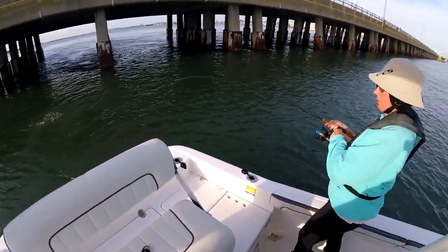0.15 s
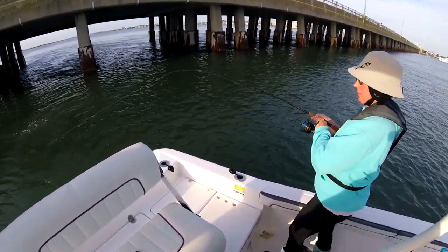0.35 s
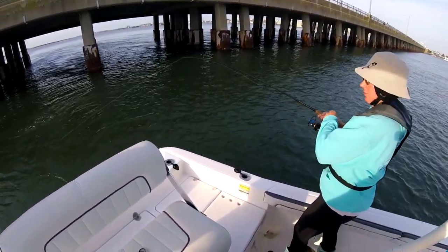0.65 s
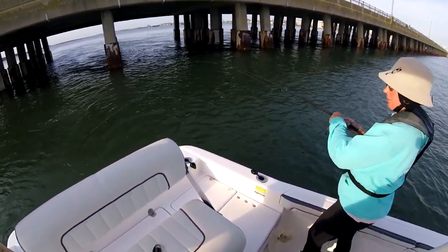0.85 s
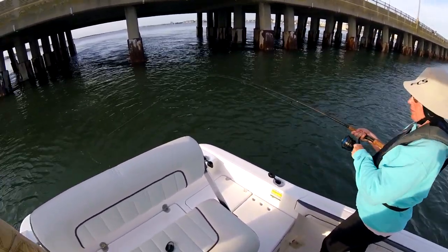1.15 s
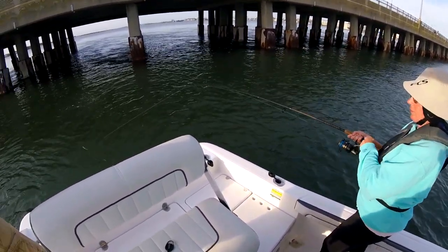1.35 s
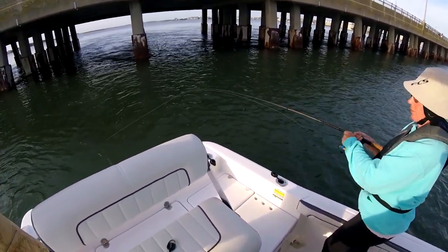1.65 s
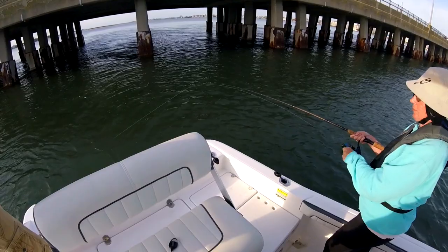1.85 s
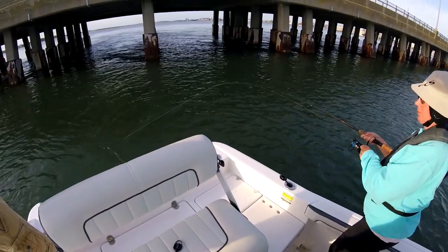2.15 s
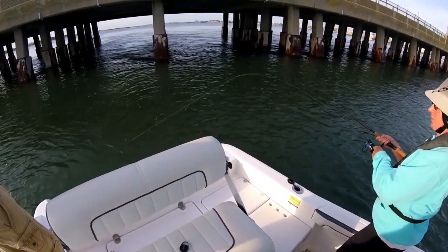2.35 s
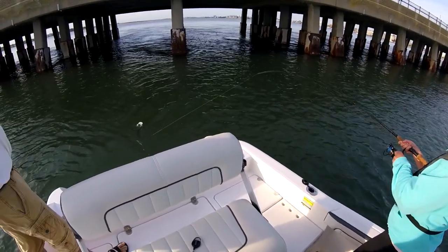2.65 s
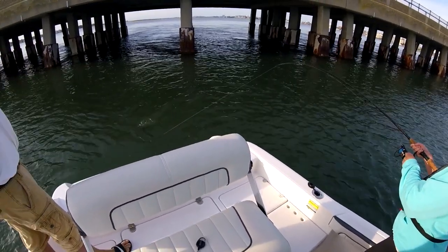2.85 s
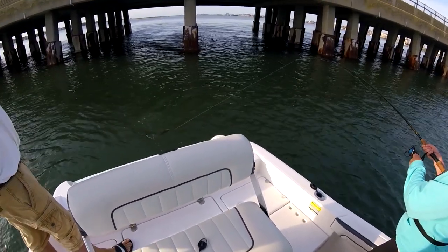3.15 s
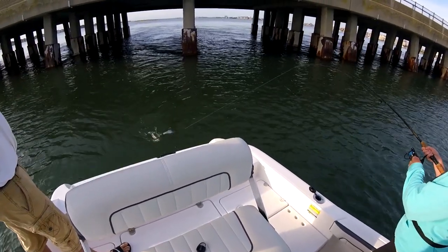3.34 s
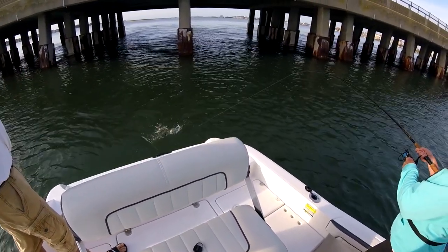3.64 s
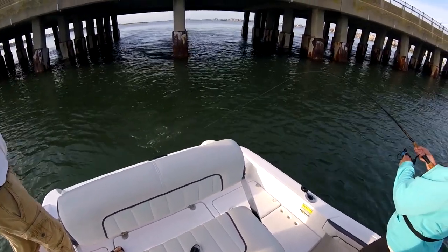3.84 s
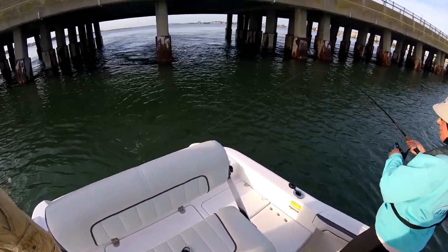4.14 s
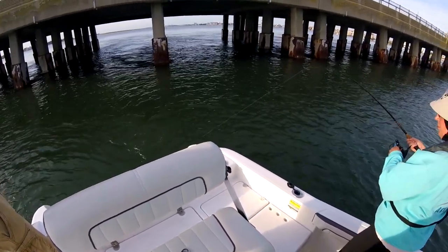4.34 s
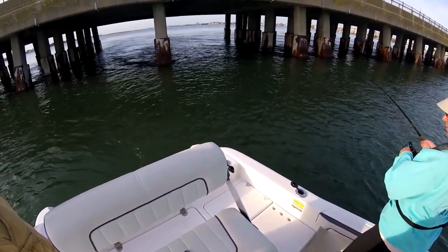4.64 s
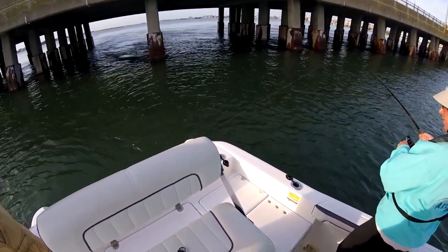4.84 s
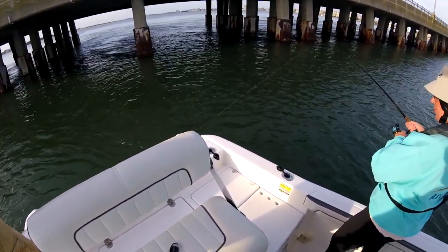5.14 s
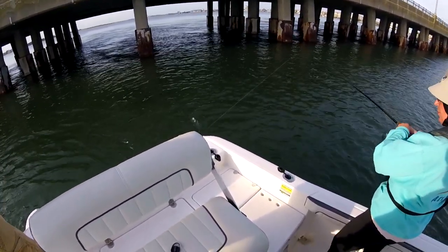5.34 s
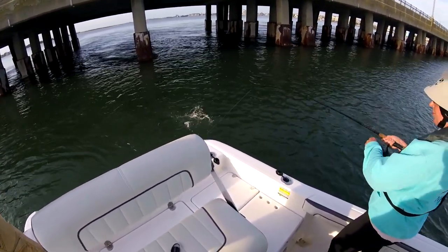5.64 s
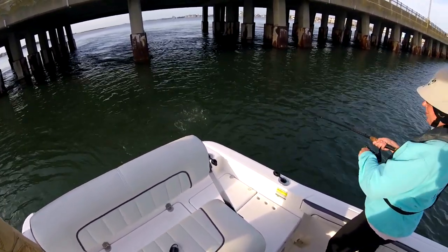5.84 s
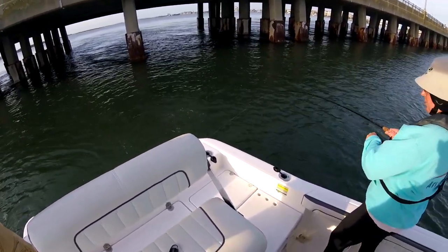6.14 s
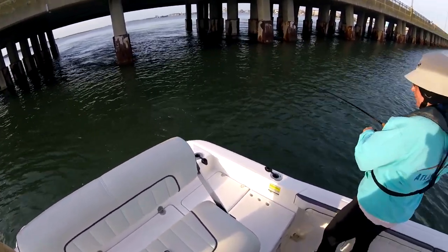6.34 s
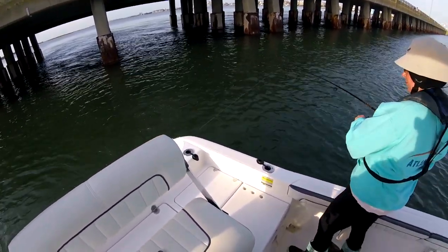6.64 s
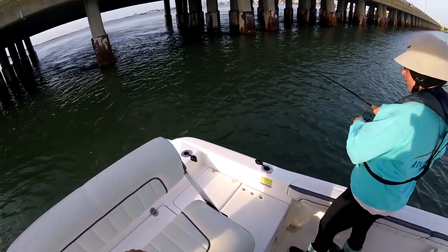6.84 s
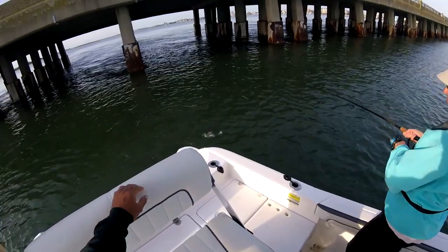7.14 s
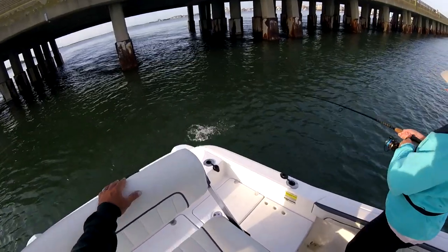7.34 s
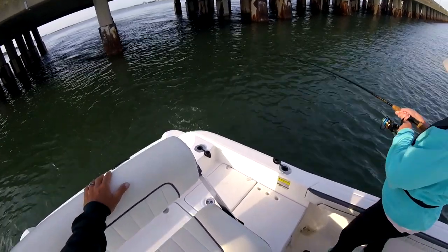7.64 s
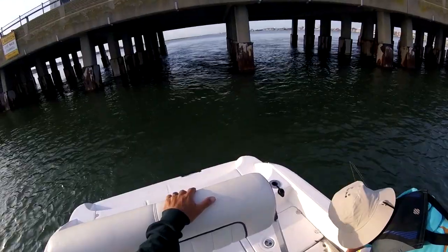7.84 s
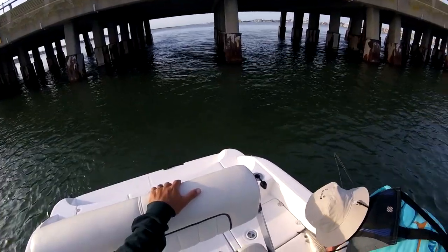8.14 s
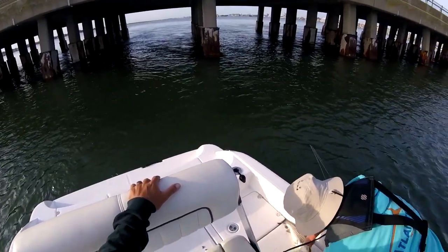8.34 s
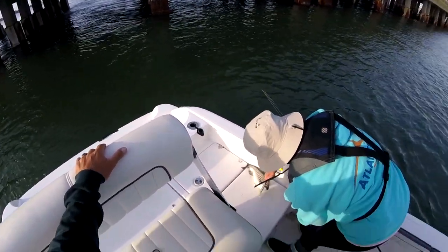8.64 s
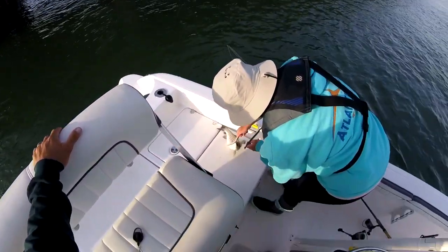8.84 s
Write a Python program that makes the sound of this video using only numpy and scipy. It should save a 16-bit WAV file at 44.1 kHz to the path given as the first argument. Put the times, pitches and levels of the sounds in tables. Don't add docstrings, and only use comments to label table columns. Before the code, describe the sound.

A small boat's engine idles with a low hum while wind buffets the microphone, a fish splashes nearby, and a hand thumps a cushion.

```python
import sys
import numpy as np
from scipy import signal
from scipy.fft import rfft, irfft, next_fast_len
from scipy.io import wavfile
from scipy.ndimage import uniform_filter1d, map_coordinates

SR = 44100
rng = np.random.default_rng(int(sys.argv[2]) if len(sys.argv) > 2 else 0)


def log_audio(samples):
    frames = np.atleast_2d(samples).T
    limited = np.clip(frames, -1, 1)
    pcm = np.round(limited * 32767).astype(np.int16)
    wavfile.write(sys.argv[1], SR, pcm)


def nominal_scale(level):
    x = np.asarray(level, float) / 20
    return 10 ** x


N = 396459

# (time [s], firing rate [Hz], third order level [dB])
IDLE = [(0.0, 42.6, -38), (0.32, 44.32, -32), (1.2, 43.87, -33), (1.4, 42.2, -36), (1.65, 43.37, -33.5),
        (2.53, 43.1, -34.5), (2.63, 43.81, -33), (3.98, 43.07, -33.5), (4.06, 41.84, -39.5),
        (4.46, 42.02, -32.5), (4.56, 43.54, -34), (7.24, 43.76, -33), (7.59, 42.4, -35),
        (7.76, 45.3, -29.5), (8.01, 42.8, -36), (8.49, 42.7, -34), (8.66, 44.25, -33.5), (8.99, 43.95, -31)]
# (frequency [Hz], gain [dB])
SOFT_HISS = [(2000, -30), (2900, 3), (3500, -12), (4200, -8), (5200, 1), (6200, -3.5), (7600, -7),
             (9000, -18), (11000, -12.5), (13000, -40)]


def unit(x):
    return x / np.sqrt(np.mean(x ** 2) + 1e-20)


def curves(rows):
    s, *cols = np.transpose(rows)
    return [np.interp(np.arange(N) / SR, s, c) for c in cols]


def wobble(rate_hz):
    return map_coordinates(rng.standard_normal(int(N * rate_hz / SR) + 4), [np.arange(N) * rate_hz / SR])


def bells(rows):
    t = np.arange(N) / SR
    return sum(height * np.exp(-((t - s) / length_s) ** 2) for s, height, length_s in rows)


def filtered(x, response):
    m = next_fast_len(N + SR // 2)
    return irfft(rfft(x, m) * response(np.fft.rfftfreq(m, 1 / SR)), m)[:N]


def above(x, hz):
    return filtered(x, lambda f: 1 / (1 + (hz / (f + 1)) ** 6))


def colour(points):
    hz, db = np.transpose(points)
    return lambda f: nominal_scale(np.interp(np.log(f + 1), np.log(hz), db))


def modes(rows):
    def response(f):
        total = 0
        for k, (hz, width_hz, db) in enumerate(rows):
            damping = 1j * f * width_hz
            total = total + (-1) ** k * nominal_scale(db) * damping / (hz * hz - f * f + damping)
        return total
    return response


def rush(response, patchy_db):
    z = signal.stft(rng.standard_normal(N), nperseg=512)[2]
    field = uniform_filter1d(rng.standard_normal(z.shape), size=6, axis=0)
    field = uniform_filter1d(field, size=14, axis=1)
    noise = signal.istft(z * nominal_scale(patchy_db * unit(field)), nperseg=512)[1][:N]
    return unit(filtered(noise, response))


def turned():
    return np.interp(np.arange(N) / SR, [7.68, 8.06], [0, 1])


def road():
    # (frequency [Hz], density [dB per Hz])
    tyres = [(210, -37), (350, -3), (389, -9), (436, -4.5), (480, -12), (617, -11.5), (872, -6.5),
             (1180, -10), (2520, -19), (4300, -39), (5590, -58), (9460, -120)]
    # (time [s], lift [dB], half length [s])
    cars = [
        (0.1, 3, 0.77),
        (2.65, 5, 0.28),
        (3.5, 0, 0.16),
        (5.45, 3.5, .2),
        (7.2, 0.5, 0.31),
    ]
    part_db = [-43, -44, -49]
    part_away_db = [3.5, -8.5, -10]
    part_lift = [0.29, 0.55, 1.05]
    roar = rush(colour(tyres), patchy_db=1.33)
    upper, top = above(roar, hz=990), above(roar, hz=1380)
    cars_db, away = bells(cars), turned()
    parts = zip([roar - upper, upper - top, top], part_db, part_away_db, part_lift)
    return sum(nominal_scale(db + away_db * away + lift * cars_db) * part for part, db, away_db, lift in parts)


def wind():
    # (time [s], level [dB])
    steady_rows = [(0.0, -41), (0.7, -39), (1.1, -39), (1.5, -37.5), (2.2, -42), (3.1, -41), (3.4, -40.5),
                   (4.2, -41.5), (5.2, -40), (5.7, -40.5), (8.2, -42), (8.46, -36.5), (8.99, -44.5)]
    # (frequency [Hz], gain [dB])
    buffet = [(18, -69), (28, -11), (42, -4), (60, -4), (110, 0.5), (150, -1), (200, -3.5), (330, -16),
              (600, -26), (1200, -63)]
    # (time [s], level [dB], half length [s])
    gust_rows = [(0.013, -32, 0.036), (0.262, -31.5, 0.031), (0.502, -46, 0.12), (0.688, -34.5, 0.027),
                 (0.785, -36, 0.046), (0.903, -39, 0.033), (0.994, -31, 0.027), (1.67, -33, 0.033),
                 (2.192, -35.5, .06), (2.28, -34, 0.03), (2.946, -36, 0.022), (3.148, -34.5, 0.046),
                 (4.197, -45, 0.058), (4.498, -42, 0.056), (5.998, -42, 0.043), (7.79, -50, 0.044)]
    lumps = nominal_scale(0.8 * wobble(11) + 0.8 * wobble(25))
    steady = nominal_scale(curves(steady_rows)[0] + 3.5)
    gusts = bells((s, nominal_scale(db), length_s) for s, db, length_s in gust_rows)
    return (steady + gusts) * unit(lumps * rush(colour(buffet), patchy_db=0.94))


def jacket():
    start_s, attack_s, level_db = 7.78, 0.12, -58.5
    start = np.clip((np.arange(N) / SR - start_s) / attack_s, 0, 1)
    return start * nominal_scale(level_db + 1.28 * wobble(14)) * rush(colour(SOFT_HISS), patchy_db=2.5)


def stream():
    # (frequency [Hz], density [dB per Hz])
    case = [(1940, 4.5), (3300, -3), (4380, -9.5), (5330, -0.5), (5930, -4), (6540, -1.5), (7130, -6),
            (8020, -9), (9580, -12.5), (10100, -15.5), (12700, -20.5), (15200, -12), (15900, -25)]
    # (frequency [Hz], width [Hz], level [dB])
    whistle = [(899, 20, -62), (6440, 200, -67), (9600, 250, -82), (15100, 150, -84), (15580, 140, -79)]
    beat = 1 + 0.04 * np.cos(2 * np.pi * np.cumsum(curves(IDLE)[0]) / SR)
    shake = nominal_scale(0.3 * wobble(9) + 0.5 * wobble(30)) * beat
    hiss = rush(colour(case), patchy_db=1.0)
    top = above(hiss, hz=12400)
    body_db = -51.5 + 0.14 * wobble(1.81)
    top_db = -48.5 - 1 * turned()
    patter = nominal_scale(body_db) * (hiss - top) + nominal_scale(top_db) * top
    ring = 0
    for hz, width_hz, db in whistle:
        cavity = modes([(hz, width_hz, 0)])
        ring = ring + nominal_scale(db) * unit(filtered(rng.standard_normal(N), lambda f: cavity(f) ** 2))
    return shake * patter + ring


def spray():
    # (frequency [Hz], width [Hz], level [dB])
    droplets = [(4850, 290, 0), (5360, 400, -0.5), (5850, 390, 3.5), (6500, 400, -6), (8000, 1200, -21),
                (10500, 1100, -9), (2980, 600, 0.5)]
    # (start [s], hold [s], level [dB])
    bursts = [
        (1.501, 0.37, -61),
        (3.4, 0.15, -58),
        (3.622, .22, -58),
        (5.45, 0.37, -55.5),
        (7.14, .17, -56.5),
        (7.46, 0.21, -56),
    ]
    attack_s, t60_s = 0.04, 0.8
    hits_per_s = 650 * nominal_scale(2.5 * wobble(70))
    fizz = 0
    for hz, width_hz, db in droplets:
        hits = (rng.random(N) < hits_per_s / SR) * rng.standard_normal(N)
        fizz = fizz + nominal_scale(db) * unit(filtered(hits, modes([(hz, width_hz, 0)])))
    t, swell = np.arange(N) / SR, 0
    for s, hold_s, db in bursts:
        rise = np.clip((t - s) / attack_s, 0, 1)
        swell = swell + rise * nominal_scale(db - 60 * np.maximum(t - s - hold_s, 0) / t60_s)
    return unit(fizz) * swell


def splashes():
    # (time [s], level [dB], t60 [s], low part [dB])
    rows = [
        (5.24, -46, .09, -4),
        (5.448, -46.5, .14, 4),
        (5.505, -47.5, 0.098, 1),
        (7.183, -48, 0.095, 4),
        (7.55, -52, .1, 1),
        (2.93, -53, .08, -1.5),
        (4.9, -59, 0.095, 11),
    ]
    # (frequency [Hz], gain [dB])
    wash = [(500, -30), (900, -3), (2500, 3.5), (4500, -6.5), (7000, -31)]
    t, high, low = np.arange(N) / SR, 0, 0
    for s, db, t60_s, low_db in rows:
        age = np.maximum(t - s, 0)
        swell = nominal_scale(db - 60 * age / t60_s) * (1 - np.exp(-age / 0.0036))
        high = high + swell
        low = low + nominal_scale(low_db) * swell
    grain = nominal_scale(3.9 * wobble(250))
    return grain * (high * rush(colour(SOFT_HISS), patchy_db=-0.5) + low * rush(colour(wash), patchy_db=-6.0))


def drops():
    # (time [s], peak [dB], pitch [Hz], plop [dB])
    rows = [(1.6811, -44, 6500, -10), (2.8455, -38, 5820, -6), (2.9612, -45, 5690, -3),
            (3.4057, -38.5, 5460, -15), (3.4361, -39, 5840, -13), (3.454, -30.5, 6440, -5),
            (3.5271, -35, 4690, 0), (3.71, -42.5, 5750, 8.5), (3.797, -34, 5800, -14),
            (4.0107, -43.5, 6440, 5), (5.239, -40, 6560, -2), (5.3332, -43, 5660, -6),
            (5.4415, -38, 4204, -8), (5.457, -39, 5600, -6), (5.6271, -41, 5555, -12),
            (5.6635, -42, 5050, -12), (5.7623, -41, 5540, -15), (7.055, -40, 6420, -18),
            (7.1231, -40, 6120, -3), (7.1851, -43, 5770, -3), (7.1921, -36, 5820, -5),
            (7.2713, -40, 4800, -12), (7.3244, -40, 3800, -8), (7.4861, -36, 5060, -14),
            (7.5065, -40, 3500, 0), (7.5641, -41, 5726, -5), (7.665, -45, 5670, -16),
            (7.6759, -42, 6140, -13), (7.7343, -45, 6360, -3), (7.7494, -44, 5300, -12)]
    t60_s, attack_s = 0.031, 0.00058
    ring, crack, t = np.zeros(N + SR), np.zeros(N + SR), np.arange(SR // 10) / SR
    for s, db, hz, plop_db in rows:
        plop_hz = 2480 * (1 + 0.07 * rng.standard_normal())
        fade = nominal_scale(db - 60 * t / t60_s) * (1 - np.exp(-t / attack_s))
        tick_drift, noise, plop_drift = rng.standard_normal((3, len(t)))
        tick = nominal_scale(-4.0) * np.sin(2 * np.pi * hz * t + 0.13 * np.cumsum(tick_drift))
        plop = nominal_scale(min(plop_db, 8) - 1.5) * np.sin(2 * np.pi * plop_hz * t + 0.16 * np.cumsum(plop_drift))
        ring[round(s * SR):][:len(t)] += fade * (tick + plop)
        crack[round(s * SR):][:len(t)] += fade * noise
    case = modes([(3300, 2000, -3), (5700, 2000, 0), (10200, 1500, -9), (13800, 1200, -16)])
    return ring[:N] + filtered(crack[:N], case)


def thumps():
    # (time [s], peak [dB], pitch [Hz], half length [s])
    rows = [
        (7.686, -21, 82, 0.0082),
        (7.7014, -14.5, 196, 0.0022),
        (7.79, -32, 237, 0.014),
        (8.405, -26, 94, .015),
        (8.421, -23.5, 220, 0.011),
        (8.43, -29, 420, 0.0035),
        (7.7, -31, 600, 0.0027),
        (7.712, -32.5, 514, 0.0045),
        (5.591, -35.5, 838, 0.0056),
    ]
    t, total = np.arange(N) / SR, 0
    for s, db, hz, length_s in rows:
        swell = nominal_scale(db) * np.exp(-((t - s) / length_s) ** 2)
        total = total - swell * np.cos(2 * np.pi * hz * (t - s))
    return total


def engine():
    # (multiple, level [dB])
    weak_orders = [(1, -54), (4, -66), (5, -51), (6, -49), (7, -55.5)]
    # (frequency [Hz], width [Hz], level [dB])
    hull = [(223, 85, -2.5), (313, 66, -2.5), (519, 69, -7.5)]
    # (frequency [Hz], width [Hz], level [dB])
    cavity = [(420.6, 21.6, -1.5), (444.5, 19, 0)]
    # (time [s], change [dB], half length [s])
    chokes = [(0.1, -4.5, 0.99), (1.95, -18, 0.079), (2.45, -7, 0.056), (3.2, -10, 0.077), (3.43, -8, .05),
              (4.2, -12, 0.26), (4.73, -6, .1), (6.0, -3.5, .2), (6.28, -13, 0.072), (6.8, 2.5, 0.4),
              (7.36, -1, .1), (8.08, -10, .12), (8.95, -8, .15)]
    hz, third_db = curves(IDLE)
    second_db = -37 + 0.88 * (third_db - third_db.mean())
    turn = 2 * np.pi * np.cumsum(hz * (1 + 0.002 * wobble(9))) / SR
    hum = nominal_scale(second_db + 3.5 + 0.47 * wobble(7.7)) * np.sin(2 * turn + 0.096 * wobble(8))
    hum += nominal_scale(third_db + 3.0 + 0.37 * wobble(7)) * np.sin(3 * turn + 0.52 * wobble(8))
    for k, db in weak_orders:
        hum += nominal_scale(db + 2.0 * wobble(4)) * np.sin(k * turn + 0.49 * wobble(6))
    puffs = (1 + 0.48 * np.cos(turn)) * rng.standard_normal(N)
    chug = unit(filtered(puffs, lambda f: modes(hull)(f) / (1 + (f / 700) ** 4)))
    boom = unit(filtered(puffs, lambda f: modes(cavity)(f) / (1 + ((f - 430) / 60) ** 2)))
    tenth = nominal_scale(-3 + 1.3 * wobble(5.2)) * np.sin(10 * turn + 0.81 * wobble(9))
    boom_db = -46 - 6.5 * turned() + bells(chokes)
    return hum + nominal_scale(-42.5) * chug + nominal_scale(boom_db) * (boom + tenth)


def scene():
    background = road() + wind() + jacket()
    water = stream() + spray() + splashes() + drops()
    return (background + water + thumps() + engine())[None]


def band_limit(x):
    return signal.sosfilt(signal.butter(12, 16100, fs=SR, output="sos"), x)


def record(dry):
    top_hz = 15740
    mix = filtered(dry[0], lambda hz: hz < top_hz)[None]
    return band_limit(mix)


dry = scene()
out = record(dry)
log_audio(out)
```